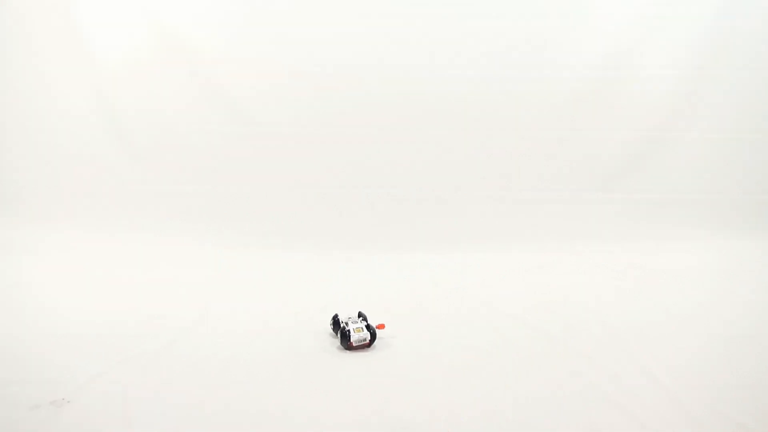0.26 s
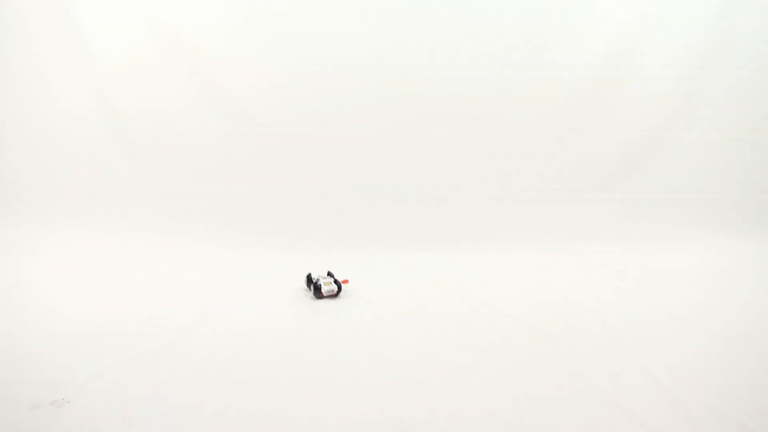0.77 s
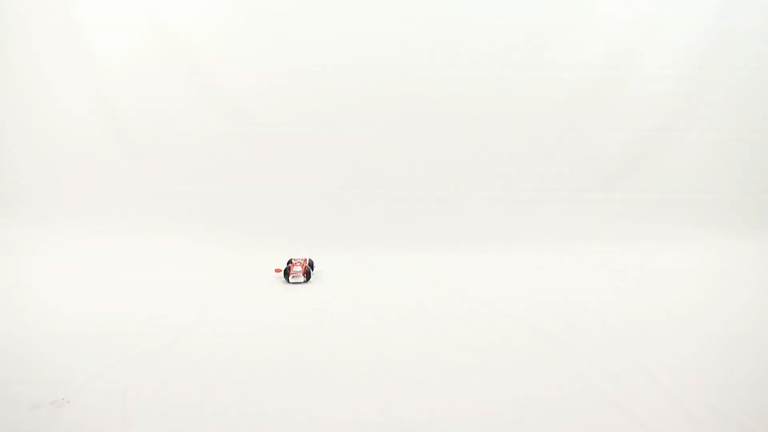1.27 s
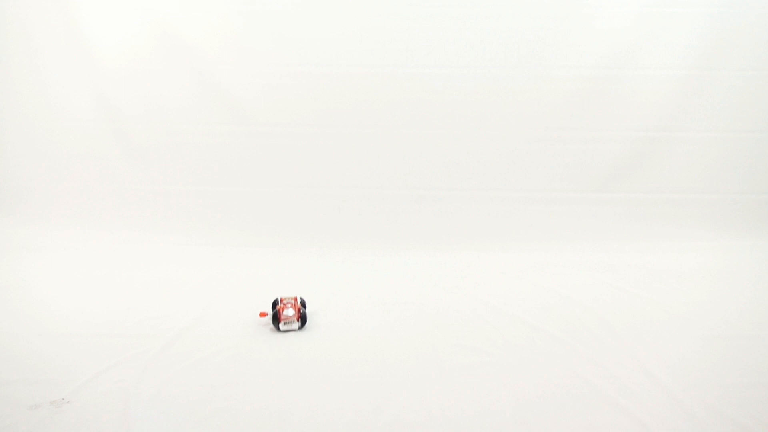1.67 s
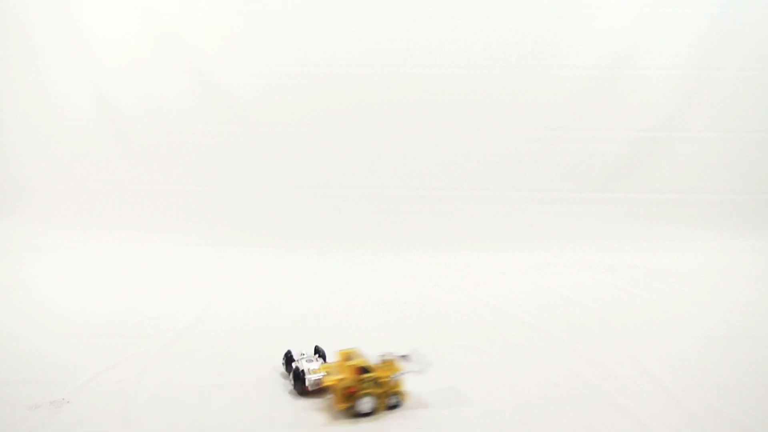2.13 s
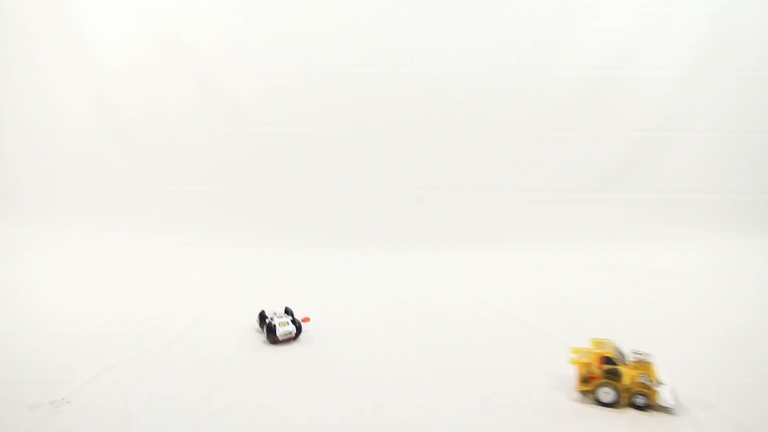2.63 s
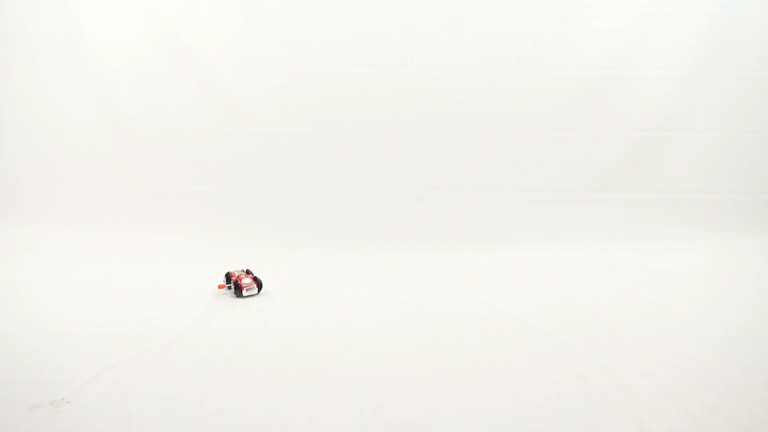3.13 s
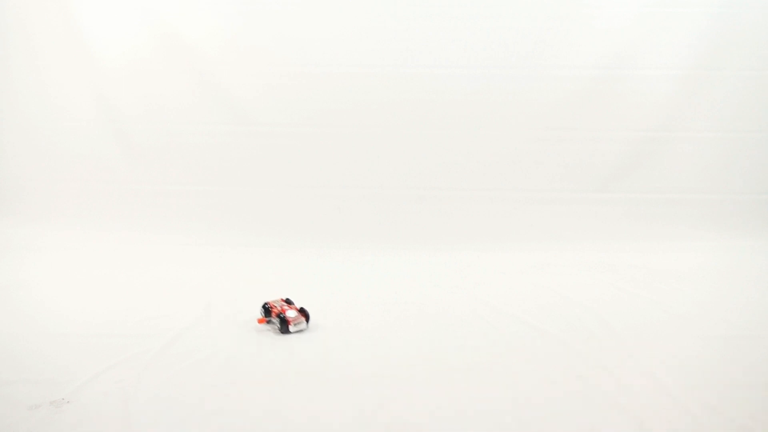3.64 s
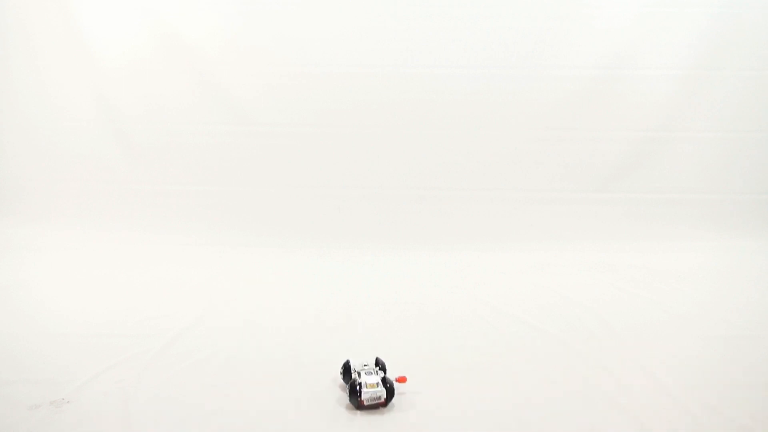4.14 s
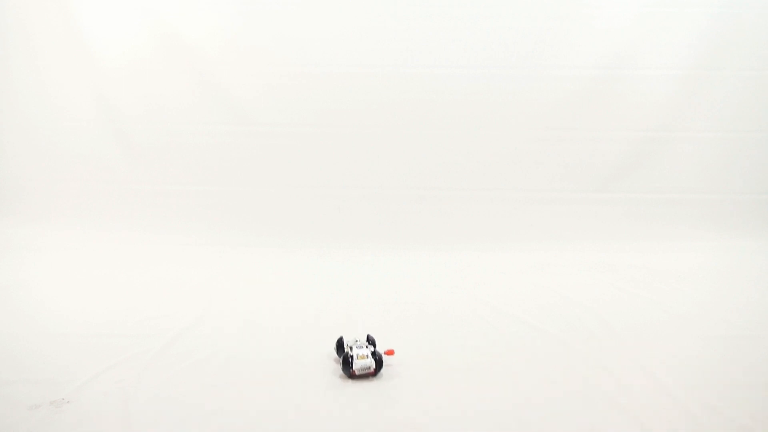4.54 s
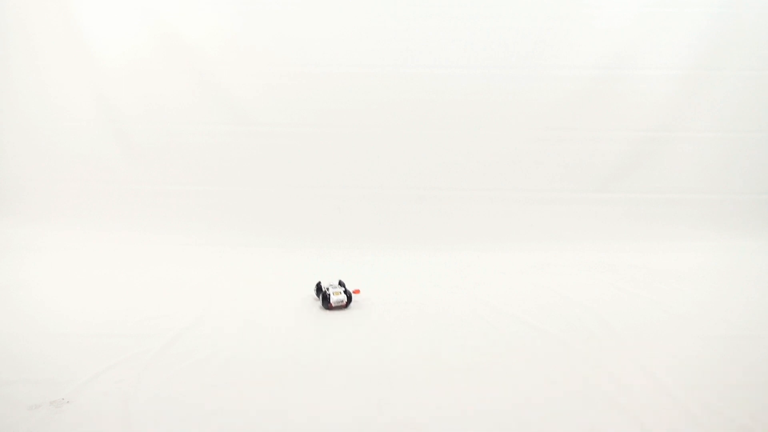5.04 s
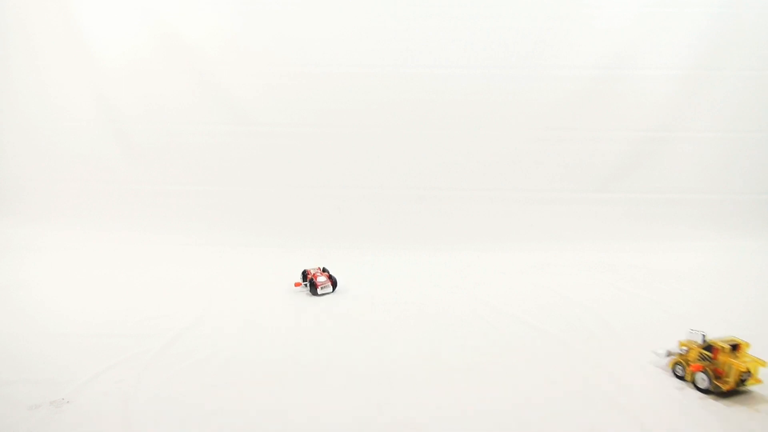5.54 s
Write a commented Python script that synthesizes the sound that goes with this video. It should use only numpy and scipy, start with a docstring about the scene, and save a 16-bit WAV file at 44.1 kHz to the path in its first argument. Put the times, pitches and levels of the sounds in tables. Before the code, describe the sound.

Close stereo sound of a clockwork toy car on a tabletop in a small dry room. A high, hissing gear whirr rises and falls over a rattling plastic shell and a faint rumble of wheels. Clusters of clicks and knocks break in as the car flips and lands. Another wind-up toy crosses once with a falling whine, then the car carries on whirring and tumbling, a little softer by the end.

```python
"""On a table in a small dry room, a wind-up car runs to and fro, tips over and lands on its wheels
again; a second clockwork toy passes once with a sinking whine. Gear teeth tick hundreds of times a
second and blend into a whirr; a bright hiss above 11 kHz rises and falls with it. The loose plastic
shell buzzes, landings crack and clack, and the table top rumbles and thuds under the wheels.
A close stereo microphone hears it all."""
import sys
import numpy as np
from scipy import signal
from scipy.fft import rfft, irfft, next_fast_len
from scipy.io import wavfile
from scipy.ndimage import uniform_filter1d, map_coordinates

SR = 44100
rng = np.random.default_rng(int(sys.argv[2]) if len(sys.argv) > 2 else 0)


def inscribe(sig):
    """Save sig as 16-bit PCM at rate SR to the path in sys.argv[1].

    A 1-D sig is mono; a 2-D sig holds one channel per row.
    Samples are clipped to [-1, 1] before scaling.
    """
    pcm = np.round(np.clip(np.atleast_2d(sig).T, -1, 1) * 32767)
    wavfile.write(sys.argv[1], SR, pcm.astype(np.int16))


N = 255780
TIME = np.arange(N) / SR
# Wheels and shell hit the table; each level is relative to others in its column: t/s, crack/dB,
# crack centre/Hz, shell/dB, shell pitch/Hz, body clack/dB, table thud/dB, chassis tock/dB
KNOCKS = [(0.0779, -28, 2590, -46, 1830, -46.5, -49, -36),
          (0.0887, -17.5, 2790, -41, 1820, -49, -56, -37.5), (.157, -29, 2800, -56, 1790, -65, -46, -33),
          (.205, -25.5, 3000, -47, 1780, -48.5, -54, -44), (.4296, -32, 3000, -44, 1680, -54, -51, -58),
          (.504, -46, 3000, -54, 1700, -41.5, -44, -58), (.518, -52, 3000, -54, 1710, -48, -54, -68),
          (0.5923, -24, 6200, -25.5, 1880, -76, -76, -70), (.6028, -22, 5600, -44, 1830, -76, -82, -70),
          (.6159, -39, 6000, -31.5, 1756, -72, -80, -68), (0.6284, -37, 3000, -36, 1980, -77, -80, -70),
          (.752, -41, 3000, -37, 1900, -61, -76, -54), (0.8015, -22, 3340, -36, 1890, -67, -74, -55),
          (.816, -23, 2700, -33.5, 1740, -56, -76, -51), (.8745, -17.5, 3900, -47, 1800, -45.5, -57, -45),
          (.9437, -44, 3000, -48, 1950, -47.5, -54, -51), (0.9954, -19, 2800, -38, 1890, -45.5, -48, -41.5),
          (1.8381, -16, 4300, -22, 1760, -49, -37.5, -48), (1.843, -14.5, 2600, -26, 1710, -43, -42.5, -44),
          (1.851, -17.5, 5500, -28, 1720, -54, -49, -52), (1.954, -21.5, 2697, -38, 1690, -39, -46, -28),
          (2.017, -41, 3000, -45, 1660, -62, -56, -41.5), (2.35, -13.5, 4230, -26, 2000, -46, -56, -43),
          (2.3578, -16, 2400, -28, 2050, -57, -52, -44), (2.368, -25, 2800, -35, 1940, -58, -64, -55),
          (2.4333, -24, 2400, -35.5, 1690, -45, -46.5, -64),
          (2.854, -18.5, 4700, -51, 1784, -54, -55, -44.5), (2.961, -18.5, 2500, -42, 2020, -38, -44, -37),
          (2.968, -30, 2500, -34, 2180, -46, -52, -39), (3.0199, -31, 2600, -41, 1690, -48, -45, -48),
          (3.977, -22.5, 3720, -54, 2120, -54, -56, -53), (4.074, -19.5, 4500, -53, 2230, -36.5, -38, -43),
          (4.126, -22, 3870, -51, 2170, -54, -49.5, -38.5), (4.657, -24, 4000, -29.5, 1920, -67, -54, -60),
          (4.661, -19, 2900, -28.5, 1710, -55, -50, -50), (4.6664, -17.5, 2900, -28.5, 1875, -58, -67, -56),
          (4.7319, -28, 4000, -38, 1811, -56, -49, -67), (4.796, -40, 3000, -52, 1780, -53, -54, -69),
          (4.9944, -28.5, 3500, -36.5, 1700, -55, -54, -69),
          (5.1626, -17.5, 3490, -51, 2233, -50, -62, -54), (5.245, -23.5, 2900, -49, 1520, -42.5, -72, -46),
          (5.2902, -23, 2400, -50, 1780, -42.5, -44.5, -48), (5.297, -25.5, 2400, -54, 1669, -47, -46, -48),
          (5.424, -30, 2700, -35, 1800, -70, -73, -68), (5.512, -32.5, 2700, -42, 1700, -73, -70, -70),
          (5.588, -55, 3000, -61, 1700, -65, -52.5, -66)]


def clockwork(hiss_db, whirr_db, hush_db, speed):
    """Three gear stages tick and rub into a whirr under a throbbing load; a bright hiss goes with it."""
    tooth_rates = (309.3, 843, 1449)  # each stage at average speed: f/Hz
    # tone colours of the whirr and of the hiss above 11 kHz: f/Hz, level/dB
    whirr_colour = [(30, -73), (600, -11.5), (1100, -7.5), (1600, -0.5), (2350, 5), (3300, 4), (4500, 6),
                    (5600, 5.5), (7000, 3.5), (7700, 3.5), (8400, 1), (11000, 1.5), (13000, -9.5),
                    (16000, -43)]
    hiss_colour = [(8000, -53.5), (11000, -5), (11400, 7.5), (12200, 7), (13000, 9.5), (14200, 5.5),
                   (15000, 3), (16000, 5)]
    # the gearbox rasps under load, and the hiss takes on a pitch: t/s, length/s, relative level/dB, f/Hz
    rasps = [(0, 0.2, -2, 4500), (.32, 0.21, -6, 5440), (1.4, 0.49, -12.5, 4350), (1.92, .36, -4.5, 5060),
             (2.48, 0.26, -7.5, 4320), (3.2, 0.71, -13, 4500), (4.15, 0.65, -8.5, 4500),
             (5.05, 0.059, -8.5, 7400), (5.25, 0.19, -10.5, 6100)]
    hiss_rings = [(.7, 0.14, -8.5, 11700), (1.42, 0.23, -12.5, 11300), (1.66, 0.59, -23, 13200),
                  (2.5, 0.99, -15, 12300), (3.7, 1, -11.5, 12300), (5.12, 0.48, -10, 12600)]
    load = from_db(drift(17))
    teeth = rms_one(sum(ticks(hz * speed, jitter=.1, uneven_db=4.5) * rng.choice([-1, 1], N)
                        for hz in tooth_rates))
    gears = rms_one(load * (teeth + from_db(7.5) * rng.standard_normal(N)))  # the noise is the rubbing
    grainy_noise = rms_one(load * (teeth + from_db(5) * rng.standard_normal(N)))
    rasp_gain, rasp_hz = bouts(rasps, ramp_s=.079)
    rasp = rasp_gain * moving_resonance(load * rng.standard_normal(N), rasp_hz, width_hz=880)
    whirr = from_db(whirr_db) * (through(gears, response(whirr_colour)) + rasp)
    body = signal.sosfiltfilt(signal.butter(3, 2800, fs=SR, output="sos"), whirr)
    whirr = whirr - body * (1 - from_db(-hush_db))  # the hush acts only on the lower pitches
    ring_gain, ring_hz = bouts(hiss_rings, ramp_s=.079)
    ring = ring_gain * moving_resonance(load * rng.standard_normal(N), ring_hz, width_hz=500)
    hiss = from_db(hiss_db) * (through(grainy_noise, response(hiss_colour)) + ring)
    return whirr, hiss


def shell_buzz(speed, whirr_db, hush_db):
    """The loose shell chatters on the chassis: when free it rings at two pitches, when damped it rasps."""
    # spells of rattling: t/s, length/s, level/dB, lower pitch/Hz, upper over lower/dB, free share/0-1
    rattles = [(0, 0.17, -44.5, 1680, -3, .4), (.295, 0.023, -45.5, 1670, -7, .7),
               (.345, 0.061, -40, 1683, -0.5, 0.78), (.48, .12, -44, 1685, 6, 0.83),
               (.6, 0.023, -40.5, 1690, -2, 0.9), (.675, 0.034, -42.5, 1700, 7, 0.87),
               (.76, 0.08, -44.5, 1720, 4, 0.67), (.87, .21, -47.5, 1730, 10, 0.15),
               (1.13, .021, -43, 1720, 4, 0.94), (1.38, 0.48, -59.5, 1692, 9, 0.95),
               (1.86, 0.56, -38.5, 1694, 2, 0.37), (2.45, 0.45, -43, 1653, -7.5, 0.7),
               (2.96, 0.085, -52, 1700, 0, .3), (3.17, .67, -48.5, 1780, -5.5, 0.56),
               (3.97, 0.094, -51.5, 1900, 10, 0.6), (4.19, 0.16, -52.5, 1710, 2, .8),
               (4.5, 0.19, -55.5, 1710, 2, 0.4), (4.68, 0.2, -44, 1710, -6, .4),
               (4.998, .18, -46.5, 1683, -14, 0.87), (5.19, 0.21, -49, 1570, -8, 0.36),
               (5.424, 0.015, -41, 1720, -10, 0.7), (5.495, .03, -48, 1670, -14, .6),
               (5.72, 0.054, -52, 1730, -9, 0.2)]
    gain, hz, upper_db, free_share = bouts(rattles, ramp_s=.025, fade_db_per_s=18)
    hz = hz * np.exp(.012 * drift(7.6))
    upper_ratio = 1.154
    upper_share = 1 / (1 + from_db(-upper_db) ** 2)
    taps = ticks(420 * speed, jitter=.5, uneven_db=4)
    lower = moving_resonance(taps, hz, width_hz=160)
    upper = moving_resonance(taps, upper_ratio * hz, width_hz=190)
    free = np.sqrt(1 - upper_share) * lower + np.sqrt(upper_share) * upper
    damped_taps = ticks(380 * speed, jitter=.6, uneven_db=2.5)
    damped = moving_resonance(damped_taps, hz * upper_ratio ** upper_share, width_hz=776)
    buzz = np.sqrt(free_share) * free + np.sqrt(1 - free_share) * damped
    swing = np.sqrt(np.abs(uniform_filter1d(buzz ** 2, size=900)) + 1e-6)
    buzz = buzz / swing ** .58  # the shell has only so much room to swing
    buzz = rms_one(buzz * from_db(1.86 * drift(11)))
    idle_gain = from_db(whirr_db - 11.5)  # a little buzz goes on between spells
    return np.hypot(gain, idle_gain) * from_db(-hush_db) * buzz


def knocks():
    """Plastic cracks, the shell rings, the chassis tocks; the hollow body clacks and the table thuds."""
    # tone colours of the body, the table and the chassis: f/Hz, level/dB
    clack_colour = [(30, -43), (190, -18), (300, -15.5), (430, 2), (560, -7.5), (750, -12.5), (1000, -24.5),
                    (1400, -15), (4000, -43)]
    thud_colour = [(30, -42), (80, -23), (115, -14), (150, 10.5), (178, 9.5), (210, 3.5), (300, 0.5),
                   (420, -11), (1500, -43)]
    tock_colour = [(30, -55), (400, -24), (620, -1), (710, 2.5), (810, -1.5), (1000, -12.5), (2000, -23)]
    _, crack_db, crack_hz, shell_db, shell_hz, clack_db, thud_db, tock_db = np.transpose(KNOCKS)
    count = len(KNOCKS)
    crack = blows(crack_db + 15, map(crack_ring, crack_hz), tail_s=.1, tail_db=7.5, chatter_db=7)
    shell = blows(shell_db + 23, map(shell_ring, shell_hz), tail_s=.08, tail_db=-7, chatter_db=-6)
    clack = blows(clack_db + 24, [response(clack_colour)] * count, tail_s=.18, tail_db=-2, chatter_db=1)
    thud = blows(thud_db + 23.5, [response(thud_colour)] * count,
                 tail_s=.17, tail_db=7.5, chatter_db=-1.5)
    tock = blows(tock_db + 20.5, [response(tock_colour)] * count,
                 tail_s=.23, tail_db=6.5, chatter_db=11)
    return crack + shell + tock, clack + thud


def blows(levels_db, rings, tail_s, tail_db, chatter_db, chatter_s=.019):
    """Each knock is a hard hit, a chatter of tiny rebounds and a longer tail; all set one part ringing."""
    out, t = np.zeros(N + SR), TIME[:SR // 4]
    for (start, *_), db, ring in zip(KNOCKS, levels_db, rings):
        chatter, tail = rng.standard_normal((2, len(t))) * from_db(-60 * t / [[chatter_s], [tail_s]])
        chatter *= from_db(6 * np.clip(rng.standard_normal(len(t)), -2, 2))  # uneven rebounds
        burst = from_db(chatter_db) * chatter / np.linalg.norm(chatter)
        burst += from_db(tail_db) * tail / np.linalg.norm(tail)
        burst[0] = .4  # the first hard hit
        hit = signal.fftconvolve(burst, ring)
        at = round(start * SR)
        out[at:at + len(hit)] += from_db(db) * hit / np.linalg.norm(hit)
    return out[:N]


def crack_ring(centre_hz, peak_db=5.5, peak_octaves=.3):
    """The plastic's answer to a hard tap, with a broad peak that depends on the spot struck."""
    crack_colour = [(30, -68), (400, -46), (1000, 0), (1800, 4), (2600, 5), (3300, 1), (4600, 1),
                    (6000, -1), (8000, -8), (11000, -13), (12000, -1.5), (16000, 2.5)]  # tone colour of the crack: f/Hz, level/dB
    hz, db = np.transpose(crack_colour)
    grid = np.geomspace(hz[0], hz[-1], 120)
    peak = peak_db * np.exp(-.5 * (np.log2(grid / centre_hz) / peak_octaves) ** 2)
    colour_db = np.interp(np.log(grid), np.log(hz), db) + peak
    return response(np.transpose([grid, colour_db]))


def shell_ring(pitch_hz):
    """The shell's answer to one tap: three tones that swell and die quickly."""
    shell_tones = [(1, 275, 5.5), (.965, 67, -5), (1.14, 100, -0.5)]  # the shell's resonances: multiple of the pitch, width/Hz, level/dB
    t = TIME[:2048]
    ring = 0
    for ratio, width_hz, db in shell_tones:
        swell = t * np.exp(-np.pi * width_hz * t)
        ring += from_db(db) * rms_one(swell * np.sin(2 * np.pi * ratio * pitch_hz * t))
    return ring


def car_whine():
    """A pair of gears sings with a wavering tone while the car runs freely."""
    whines = [(3.15, 0.25, -65.5, 750), (3.5, .22, -64, 798), (4.22, 0.11, -61, 836),
              (4.54, 0.081, -60.5, 800)]  # spells of singing: t/s, length/s, level/dB, f/Hz
    partials = [(1, 2.5), (2, 2.5), (3, -2.5)]  # parts of the tone: multiple of the tooth rate, level/dB
    gain, hz = bouts(whines, ramp_s=.13)
    flutter = from_db(1.3 * drift(21.03))
    wavering_hz = hz * np.exp(.013 * drift(6.2))
    return gain * flutter * gear_tone(wavering_hz, partials, width_hz=135)


def second_toy_whine():
    """The second toy's gear tone sinks and fades as its spring runs down."""
    crossing = [(1.86, -65, 720), (1.97, -44, 687), (2.04, -47, 659), (2.1, -48, 632), (2.14, -51, 565),
                (2.2, -49.5, 552), (2.28, -56, 567), (2.38, -63, 548), (2.5, -110, 540)]  # its tone as it passes: t/s, level/dB, f/Hz
    partials = [(1, -15), (2, -2), (3, -5), (4, -7.5), (5, -6)]  # parts of the tone: multiple of the tooth rate, level/dB
    db, hz = in_time(crossing)
    return from_db(db) * gear_tone(hz, partials, width_hz=51)


def gear_tone(hz, partials, width_hz):
    """Turning gears sing; slack between the teeth blurs each pitch, the higher ones more."""
    slack = rng.standard_normal(N)
    return sum(from_db(db) * moving_resonance(slack, k * hz, width_hz * np.sqrt(k)) for k, db in partials)


def rolling(speed, rocking_db=-14, fade_db_per_s=96):
    """The tyre treads patter on the table top, harder while the car rocks after a knock."""
    rumble = [(0, -64), (.12, -64), (.22, -54), (.3, -69), (.45, -58), (.7, -75), (1.1, -66.5),
              (1.3, -72.5), (1.78, -64.5), (1.88, -56), (2.03, -53.5), (2.15, -64), (2.6, -58.5),
              (3.3, -67), (4.0, -62.5), (4.12, -70), (4.22, -64.5), (4.5, -64.5), (4.78, -59.5),
              (5.15, -69.5), (5.35, -56.5), (5.8, -64)]  # the wheels on the table: t/s, level/dB
    table_colour = [(30, -35), (55, -14), (78, 0.5), (112, -10.5), (148, 4), (178, 13.5), (215, 6),
                    (300, 0), (450, -1), (600, -2.5), (720, -1), (1000, -4.5), (1500, -37), (4000, -38)]  # tone colour of the table top: f/Hz, level/dB
    rumble_db, = in_time(rumble)
    power = from_db(rumble_db) ** 2
    for start, *_, thud_db, _ in KNOCKS:
        rocking = from_db(thud_db + rocking_db - fade_db_per_s * np.abs(TIME - start))
        power += (TIME > start) * rocking ** 2
    treads = ticks(260 * speed, jitter=.56, uneven_db=3) * rng.choice([-1, 1], N)
    return np.sqrt(power) * rms_one(through(treads, response(table_colour)))


def near_echoes(x, wander_s, count=10):
    """Echoes from the table and the backdrop; their paths shift as the car moves."""
    out = 0
    for k, delay_s in enumerate(rng.uniform(.002, .012, count)):
        path_s = delay_s + wander_s * drift(.684)
        out += (-1) ** k * map_coordinates(x, [(TIME - path_s) * SR], order=3)
    return out / np.sqrt(count)


def in_room(x, decay_s=.09, delay_s=.0039):
    """The small room adds dense echoes that die away fast."""
    t = TIME[:SR // 2]
    echoes = rng.standard_normal(len(t)) * from_db(-60 * t / decay_s) * (t > delay_s)
    return x + from_db(-11.5) * through(x, echoes)


def stereo_spread(x, pan_db):
    """Wide from 5 to 11 kHz, nearly centred above; an off-centre sound leans one way and gains echoes."""
    # how much left and right differ at each pitch: f/Hz, level/dB
    stereo_width = [(40, 5), (150, -21), (1500, -19.5), (4400, -20.5), (5200, -3), (6100, 1), (8000, 0.5),
                    (11100, 3), (11500, -28), (16000, -37)]  # wherever the sound is
    leaning = [(150, 0.5), (700, -3), (1500, 2.5), (2300, 1), (3200, -4.5), (5000, -1.5), (8000, 5),
               (11500, -5), (16000, -15)]  # how strongly a pitch follows the sound's place
    scattering = [(300, -24), (1500, -17), (3000, -2), (5000, -10.5), (12000, -5.5), (16000, -15)]  # echoes of an off-centre sound
    echoes = near_echoes(x, wander_s=.0008)
    shifted = -.45 * np.imag(signal.hilbert(x)) + .9 * echoes
    left, right = from_db(pan_db / 2), from_db(-pan_db / 2)
    mid = x * (left + right) / 2
    off_centre = weighted(x, leaning) + weighted(echoes, scattering)
    side = weighted(shifted, stereo_width) + (left - right) / 2 * off_centre
    return np.array([mid + side, mid - side])


def room_tone(pan_db=5):
    """The room's faint, low background noise, a little louder on the left."""
    room_colour = [(25, -9), (80, 7), (160, 15), (500, -42), (3000, -18), (16000, -29)]  # its tone colour: f/Hz, level/dB
    sides = [from_db(side * pan_db / 2) * through(rng.standard_normal(N), response(room_colour))
             for side in (1, -1)]
    return from_db(-83.5) * np.array(sides)


def from_db(db):
    """Turn decibels into a gain."""
    return 10 ** (np.asarray(db) / 20)


def rms_one(x):
    """Scale a sound to an average (rms) level of 1."""
    return x / np.sqrt(np.mean(x ** 2) + 1e-20)


def in_time(rows):
    """Join timed rows into one curve per column, sample by sample."""
    times, *columns = np.transpose(rows)
    return [np.interp(TIME, times, column) for column in columns]


def drift(rate_hz, step=40):
    """A smooth random wobble of size about 1 that changes about rate_hz times a second."""
    r = np.exp(-2 * step * np.pi * rate_hz / SR)
    slow = signal.lfilter([1], [1, -2 * r, r * r], rng.standard_normal(N // step + 2002))[2000:]
    return np.interp(np.arange(N) / step, np.arange(len(slow)), rms_one(slow))


def ticks(rate_hz, jitter, uneven_db):
    """A run of clicks, unsteady in time and in strength."""
    count = np.cumsum(rate_hz * np.exp(jitter * drift(120))) / SR
    strength = from_db(uneven_db * np.clip(rng.standard_normal(N), -2, 2))
    return rms_one(np.diff(np.floor(count), prepend=0) * strength)


def gate(start, length, ramp_s):
    """Rises to 1 by the start, holds, and falls again."""
    return np.clip(1 + np.minimum(TIME - start, start + length - TIME) / ramp_s, 0, 1)


def bouts(rows, ramp_s, fade_db_per_s=0):
    """Curves of gain, pitch and any further controls for a sound that comes in spells."""
    gain = sum(gate(start, length, ramp_s) * from_db(db - fade_db_per_s * np.maximum(TIME - start, 0))
               for start, length, db, *_ in rows)
    edges = [(t, *controls) for start, length, _, *controls in rows for t in (start, start + length)]
    return [gain] + in_time(sorted(edges))


def moving_resonance(x, hz, width_hz):
    """Make x ring at a gliding pitch; a smaller width gives a purer tone."""
    carrier = np.exp(2j * np.pi * np.cumsum(hz) / SR)
    r = np.exp(-np.pi * width_hz / SR)
    return rms_one(np.real(carrier * signal.lfilter([1], [1, -2 * r, r * r], x / carrier)))


def response(colour, size=4096):
    """How a thing with this tone colour rings after one click (minimum phase)."""
    hz, db = np.transpose(colour)
    grid = np.maximum(np.arange(size // 2 + 1) * SR / size, 1)
    cepstrum = irfft(np.log(from_db(np.interp(np.log(grid), np.log(hz), db))))
    cepstrum[1:size // 2] *= 2
    cepstrum[size // 2 + 1:] = 0  # nothing sounds before the click
    return irfft(np.exp(rfft(cepstrum)))


def through(x, ring):
    """Play x through a ring scaled to an energy of 1."""
    return signal.fftconvolve(x, ring / np.linalg.norm(ring))[:N]


def weighted(x, colour):
    """Give each pitch in x its own gain, with no delay."""
    hz, db = np.transpose(colour)
    size = next_fast_len(N + SR // 4)
    grid = np.maximum(np.fft.rfftfreq(size, 1 / SR), 1)
    return irfft(rfft(x, size) * from_db(np.interp(np.log(grid), np.log(hz), db)), size)[:N]


def scene():
    """The toys, the table and the room, in stereo."""
    spring_drive = [(0, -37, -40.5), (.2, -37, -40.5), (.3, -42.5, -42), (.5, -40, -42), (.7, -37.5, -42.5),
                    (.97, -35.5, -40.5), (1.12, -41.5, -46.5), (1.36, -41.5, -48), (1.5, -36.5, -46.5),
                    (1.8, -36, -43), (1.9, -34.5, -40.5), (2.05, -33.5, -40), (2.3, -37, -41),
                    (2.55, -40.5, -45), (3.0, -41, -42.5), (3.16, -41, -48), (3.9, -42, -46.5),
                    (4.3, -41, -45.5), (4.45, -43, -49), (4.62, -44, -45.5), (4.79, -40, -45),
                    (4.97, -46, -47.5), (5.07, -39, -42.5), (5.2, -36.5, -40.5), (5.38, -39, -43.5),
                    (5.5, -45, -46.5), (5.8, -45.5, -48)]  # how loudly the clockwork runs: t/s, hiss/dB, whirr/dB
    stalls = [(0.639, .02, 6, -0.5), (1.28, .03, 9.5, 2), (2.399, .02, 5, -5.5), (4.387, .03, 3, -1.5),
              (4.71, .02, 6, 5), (4.859, .04, 4.5, 12), (4.892, .026, 0, 4), (5.567, .05, 2, 3.5)]  # the wheels catch: t/s, length/s, hiss drop/dB, hush of the car's body/dB
    toy_place = [(0, 3.5), (.4, 6), (.75, 8), (1.15, 7), (1.5, 8), (1.82, 10.5), (2.0, 6.5), (2.4, 1.5),
                 (2.9, 0.5), (3.3, -1), (3.8, -1), (4.08, 2), (4.5, -1), (4.67, -4.5), (4.85, -0.3),
                 (5.3, 0.3), (5.8, -2.5)]  # where the toys are: t/s, left over right/dB
    stall_db, hush_db = sum(np.outer(drops, gate(start, length, ramp_s=.035))
                            for start, length, *drops in stalls)
    hiss_db, whirr_db = in_time(spring_drive)
    hiss_db -= stall_db
    whirr_db -= .58 * stall_db
    pan_db, = in_time(toy_place)
    speed = from_db(.15 * (hiss_db - hiss_db.mean()))  # faster gears are louder
    whirr, hiss = clockwork(hiss_db, whirr_db, hush_db, speed)
    motor = whirr + shell_buzz(speed, whirr_db, hush_db)
    motor = .93 * motor + .37 * near_echoes(motor, wander_s=.000417)
    plastic, thuds = knocks()
    toys = motor + car_whine() + second_toy_whine() + plastic
    table = rolling(speed) + thuds
    toys, table = in_room(toys), in_room(table)
    return room_tone() + stereo_spread(toys + hiss, pan_db) + stereo_spread(table, pan_db=5.5)


def record(dry, cutoff_hz=15900):
    """Cut off the highest treble steeply."""
    return signal.sosfilt(signal.ellip(12, .1, 80, cutoff_hz, fs=SR, output="sos"), dry)


dry = scene()
out = record(dry)
inscribe(out)
```